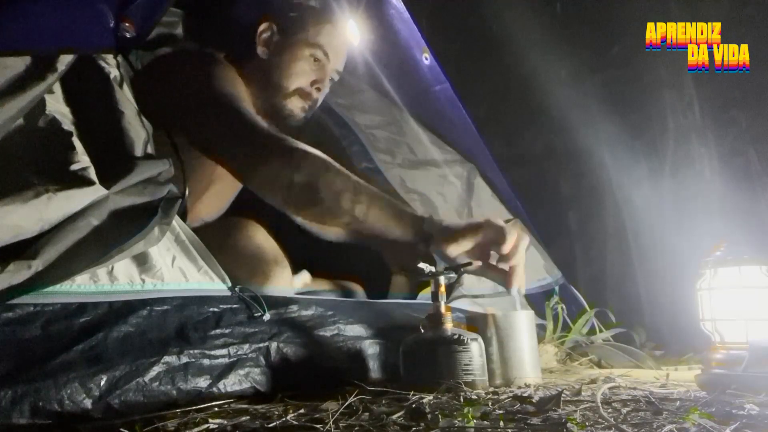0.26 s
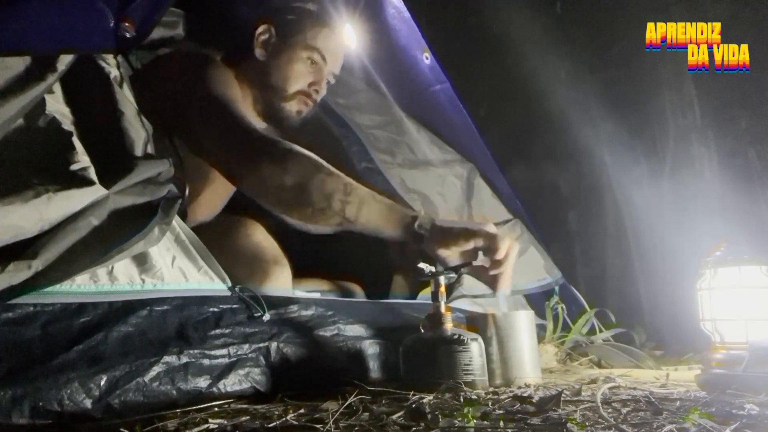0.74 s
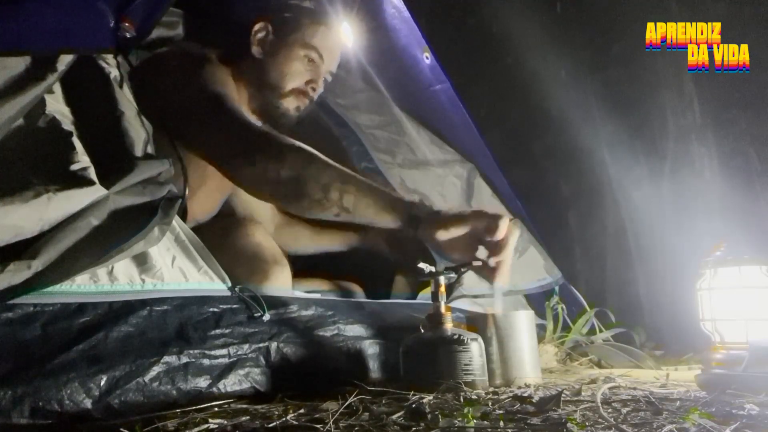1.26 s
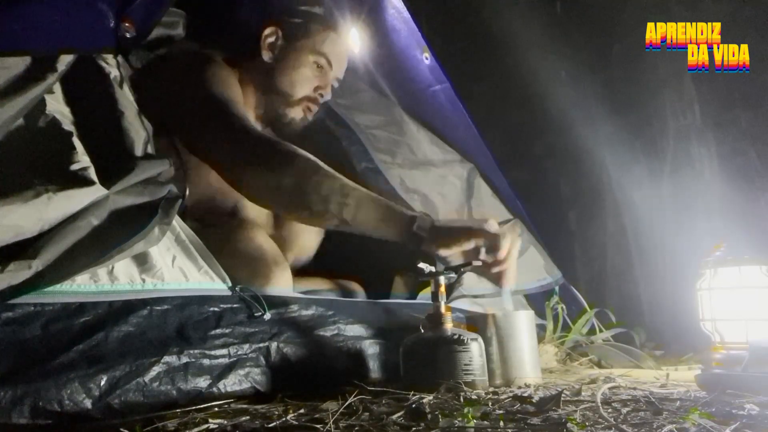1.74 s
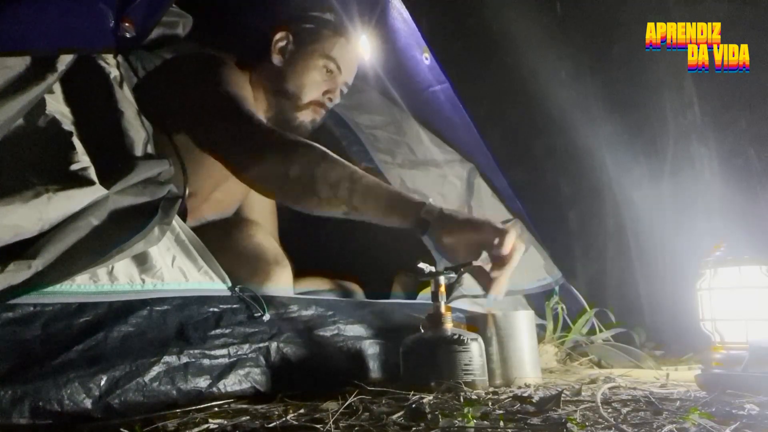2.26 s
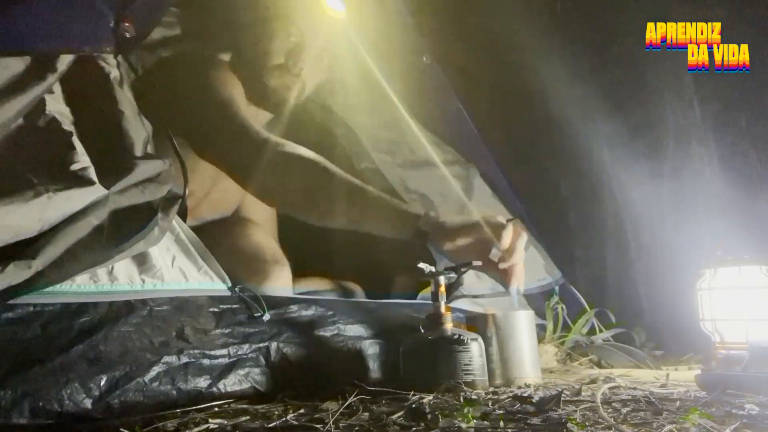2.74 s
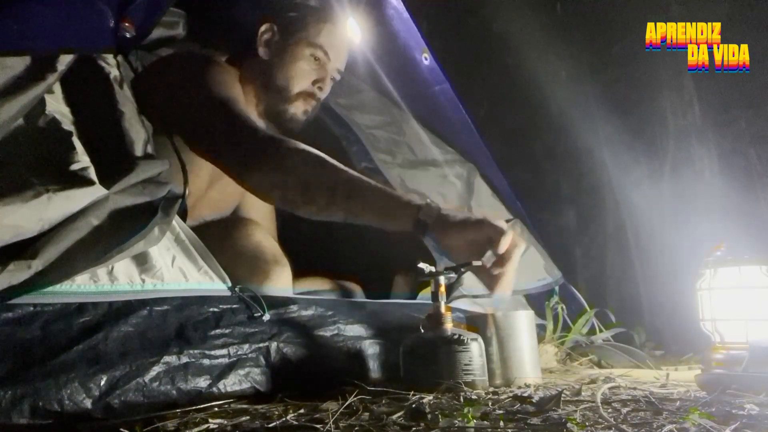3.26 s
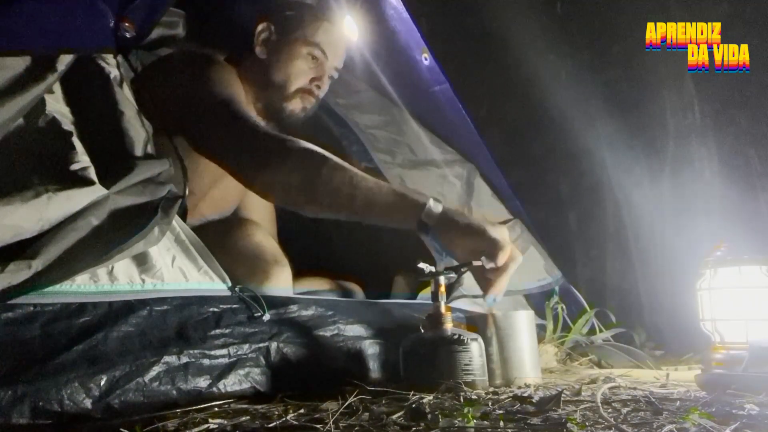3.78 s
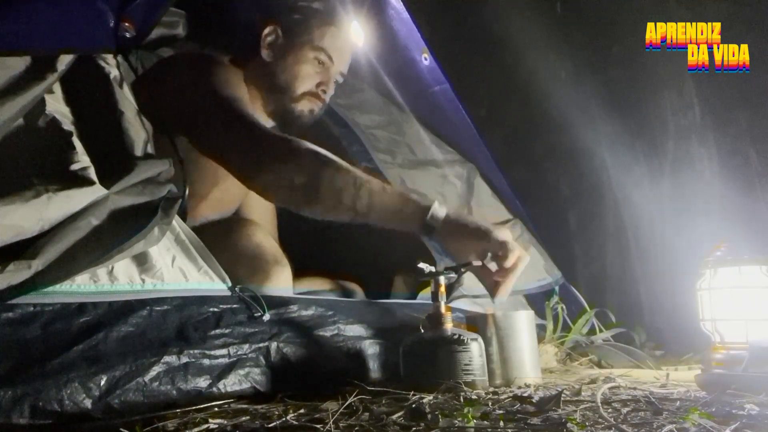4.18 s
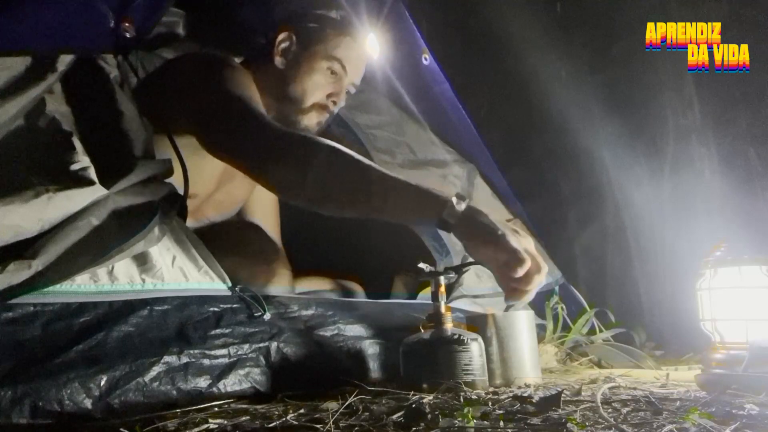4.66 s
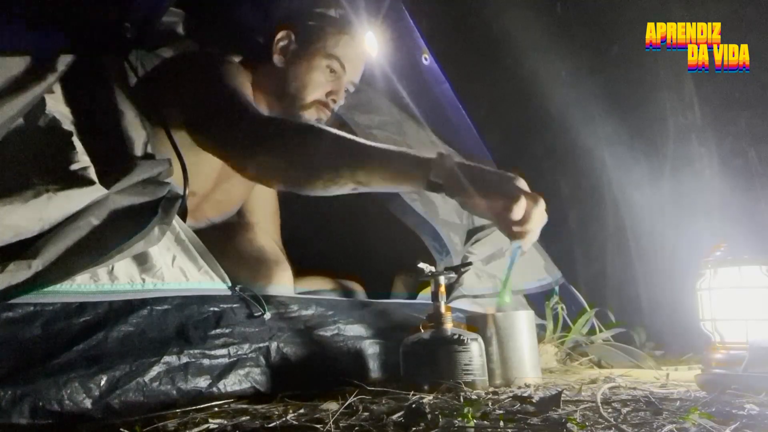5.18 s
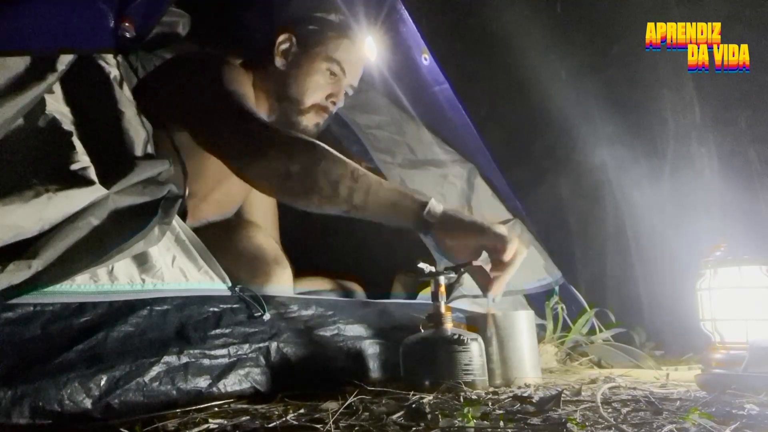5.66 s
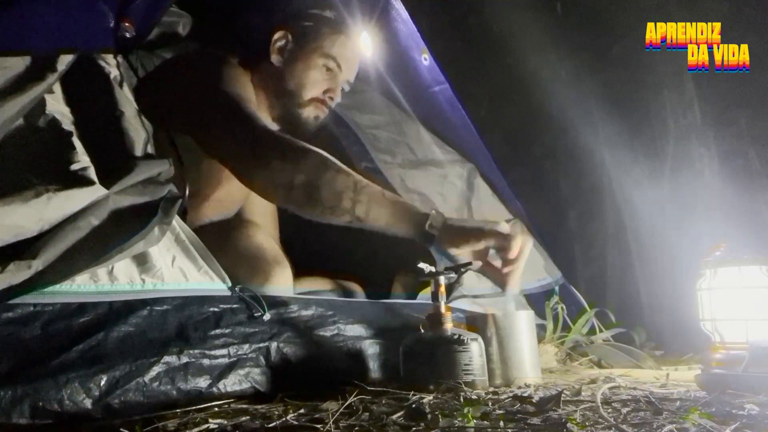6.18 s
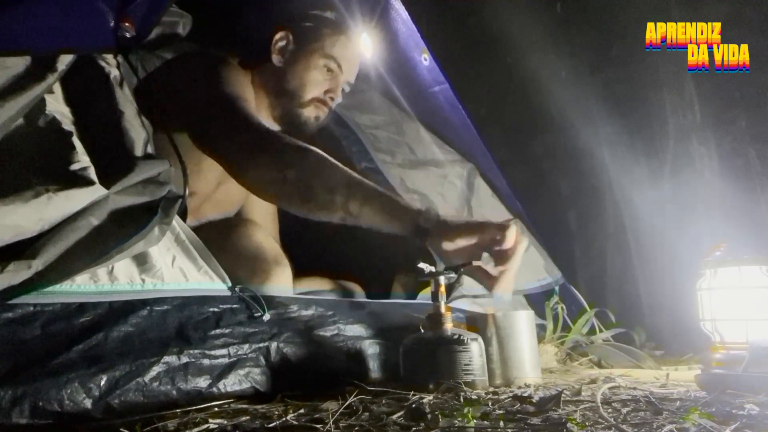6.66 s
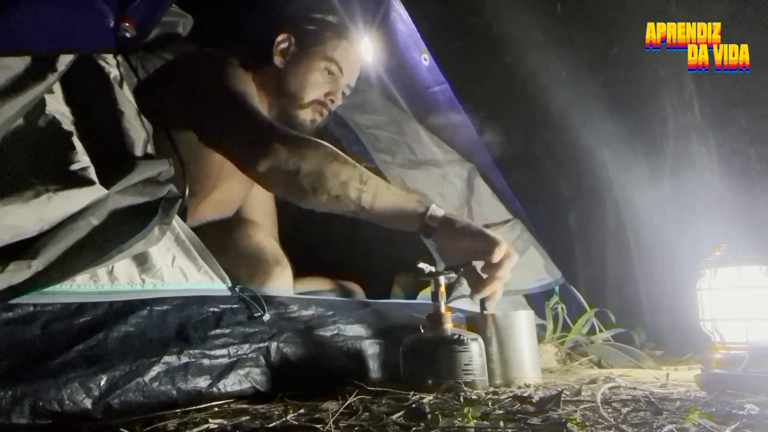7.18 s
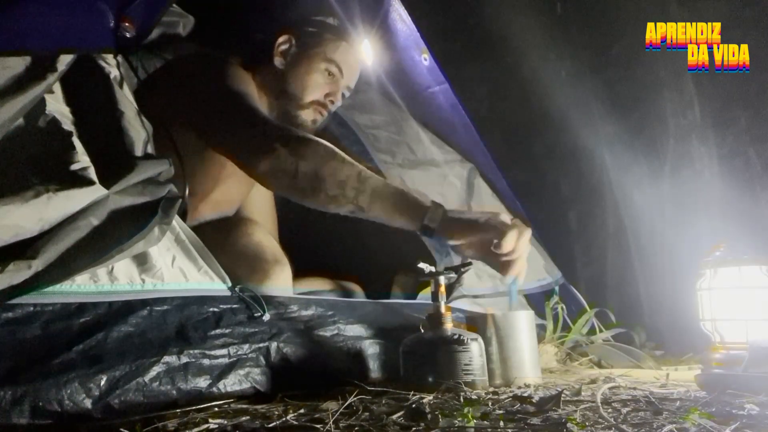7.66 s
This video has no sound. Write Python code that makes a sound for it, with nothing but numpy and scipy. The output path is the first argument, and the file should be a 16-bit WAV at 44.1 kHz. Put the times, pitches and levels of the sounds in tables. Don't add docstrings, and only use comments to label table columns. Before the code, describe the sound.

A low, soft gas flame roar close by, nylon rubbing and crinkling with small cup knocks, crickets trilling and a katydid rasping in the night.

```python
import sys
import numpy as np
from scipy import signal
from scipy.fft import rfft, irfft, next_fast_len
from scipy.io import wavfile
from scipy.ndimage import uniform_filter1d, map_coordinates

SR = 44100
rng = np.random.default_rng(int(sys.argv[2]) if len(sys.argv) > 2 else 0)


def waveform_to_disk(signal):
    frames = np.transpose(np.atleast_2d(signal))
    scaled = np.clip(frames, -1, 1) * 32767
    samples = np.round(scaled).astype(np.int16)
    wavfile.write(sys.argv[1], SR, samples)


def attenuation_scalar(level_db):
    decades = np.asarray(level_db, float) / 20
    return 10 ** decades


N = 349272

# (frequency [Hz], density [dB per Hz])
NIGHT_SPECTRUM = [(1200, -30), (2000, 0), (3080, 4.5), (3200, -4.5), (3900, -8.5), (4500, -8), (5800, 3),
                  (6800, -21), (7200, -24), (7700, -15), (9600, -17.5), (11000, -17.5), (15000, -22),
                  (16000, -32)]
# (pitch [Hz], spread [Hz], pulse rate [1/s], pulse [s], pitch fall [Hz], level [dB])
CHORUSES = [
    (2985, 40, 48, .017, 110, -60),
    (5483, 130, 55, .007, 220, -65.5),
    (6261, 125, 58, .0065, 220, -55.5),
]
# (multiple [1], level [dB])
LOW_CHORUS_OVERTONES = [(3, -17.5), (4, -26)]
# (time [s], length [s], level [dB])
PAIR_BOUTS = [(-.2, 0.32, -60), (.2, 1.2, -76), (1.052, .9, -67.5), (2.0, 1.3, -78), (2.95, 0.82, -69),
              (4.5, 1.05, -69.5), (6.35, 1.03, -68.5)]
# (time [s], rasp count [1])
RASP_COUNT = [(.118, 0), (2.158, 12), (3.545, 20), (4.081, 23), (4.899, 28), (7.955, 46)]
# (frequency [Hz], density [dB per Hz])
WING_SPECTRUM = [(6800, -45), (7300, -22), (7900, -8.5), (8300, -7.5), (8900, -9.5), (9400, -13)]
# (frequency [Hz], density [dB per Hz])
ROAR_SPECTRUM = [(12, -69), (20, -29), (37, -20), (56, -6.5), (81, -0.5), (112, -5), (245, -13), (450, -27),
                 (642, -27.5), (1210, -37), (2000, -46), (2700, -69), (2900, -57)]
# (frequency [Hz], width [Hz], level [dB])
CUP_FLUTTER = [(302, 182, -1.5)]
# (time [s], level [dB])
DRAUGHT_LEVEL = [(0, 6.5), (1, 7), (1.9, 7.5), (2.3, 8.5), (2.8, 2.5), (3.6, 1.5), (5.3, -0.5), (5.9, 7.5),
                 (7, 1), (7.92, 3)]
# (time [s], length [s], frequency [Hz], level [dB])
CUP_HUM = (2, .4, 343.5, -46)
# (frequency [Hz], density [dB per Hz])
THUD_SPECTRUM = [(150, 7), (300, 4), (900, 10), (1500, -2.5), (2500, -43), (4000, -60)]
# (frequency [Hz], density [dB per Hz])
SWISH_SPECTRUM = [(1000, 6), (2000, 8.5), (4200, 13), (7000, 7), (9000, -21), (12000, -28)]
# (frequency [Hz], density [dB per Hz])
CRINKLE_SPECTRUM = [(4000, -6), (7500, 3.5), (11000, -4.5), (14000, -6), (16000, -12)]
# (frequency [Hz], density [dB per Hz])
SPARKLE_SPECTRUM = [(10000, -26), (12500, -6), (13700, 5), (15500, -6)]
# (time [s], length [s], swish [dB], crinkle over swish [dB])
HAND_GRABS = [(0, 0.031, -62.5, -5), (0.07, 0.042, -62, -5.5), (0.134, 0.027, -56, -6.5),
              (0.146, 0.11, -64, -6), (.235, .025, -52, -7), (0.26, 0.085, -69.5, -12),
              (0.341, 0.021, -64, -12), (.38, .092, -69.5, -5), (0.555, 0.032, -56.5, -5.5),
              (.59, .055, -66, -4), (.69, .034, -72, -3), (0.736, .074, -66.5, -1), (0.784, 0.023, -59, -5),
              (0.813, 0.031, -61, -10), (0.854, 0.045, -56.5, -4), (.93, .13, -76, -8),
              (1.072, .041, -67, -4), (1.128, 0.031, -62.5, -2), (1.168, .061, -69, -1),
              (1.248, 0.05, -65, 0), (1.288, .025, -53, 2), (1.323, 0.033, -53, -4), (1.343, .036, -65, -4),
              (1.58, .12, -75, -5), (1.74, .07, -72, -7), (1.838, 0.065, -72, 0), (0, .55, -79, -5),
              (.45, .6, -78, -1), (1, .46, -77, -3)]
# (time [s], length [s], swish [dB])
ARM_STIRS = [(1.953, 0.032, -63), (1.993, 0.035, -71), (2.016, .047, -64.5), (2.193, 0.1, -69),
             (2.433, .11, -75), (2.592, 0.035, -63.5), (2.639, 0.065, -65), (2.877, .09, -67.5),
             (3.12, 0.09, -70.5), (3.21, 0.068, -70.5), (3.428, 0.19, -70), (3.738, 0.08, -70),
             (3.92, .2, -77), (4.263, 0.081, -73), (5.88, .39, -78.5)]
# (time [s], length [s], crinkle [dB])
FILM_FLEXES = [(1.97, .05, -73), (4.82, 0.16, -81), (5.1, .025, -73), (7.242, 0.091, -76),
               (7.468, .03, -71), (7.622, .018, -71), (7.658, 0.1, -83)]
# (time [s], crinkle peak [dB], swish over crinkle [dB])
FOLD_SNAPS = [(.2474, -55, 9), (.3421, -64, -8), (.3474, -66, 6), (.4234, -56, 0), (.519, -62, 3),
              (.6958, -59, -3), (.8634, -41, -7), (1.1313, -51, 5), (1.1875, -50, -4), (1.2521, -56, 1),
              (1.2974, -49, -6), (1.3259, -49, -3), (1.3364, -34.5, 5.5), (1.7534, -49, 4),
              (1.7574, -50, -8), (1.7908, -50, -11), (1.7964, -47, 1), (2.0024, -49, 6), (2.2744, -52, 17),
              (2.4917, -62, -2), (2.536, -45.5, 6), (2.594, -61, 8), (3.3373, -55, -3), (4.3026, -63, 5),
              (1.8462, -53, 11), (.1431, -64, 3)]
# (time [s], crinkle peak [dB], swish over crinkle [dB])
FILM_TICKS = [(.389, -62, -14), (2.494, -59, -6), (2.537, -55, -20), (3.1223, -62, -14), (4.2263, -58, -18),
              (5.1073, -52, -24), (5.1136, -45, -14), (5.3233, -58, -10), (6.0412, -62, -8),
              (7.2504, -58, -10), (7.2853, -58, -4), (7.3447, -50, -10), (7.478, -58, -24),
              (7.6301, -52, -8), (7.9154, -50, -12)]
# (time [s], peak [dB], ring
# [Hz], t60 [s], low thump [dB])
KNOCKS_AND_RINGS = [(.143, -43, 910, 0.017, -26), (0.2481, -20, 950, 0.014, -24), (.2482, -26, 490, 0.028, -50),
                    (0.866, -42, 1130, .03, -42), (.348, -27, 1100, 0.0065, -40), (0.573, -33, 1070, 0.022, -37),
                    (.793, -31.5, 706, 0.024, -26.5), (1.326, -23.5, 785, 0.02, -36),
                    (1.33, -28.5, 517, 0.031, -40), (1.337, -30.5, 1110, 0.017, -24),
                    (1.848, -32, 1280, 0.0079, -48), (1.8455, -44, 3280, 0.0069, -70),
                    (4.675, -45, 1650, 0.027, -70), (.125, -62, 4500, 0.046, -72), (.306, -48, 3590, .05, -72),
                    (1.082, -50, 4400, .05, -70), (1.092, -47, 4760, 0.038, -70)]

ROAR_DB, FLUTTER_DB, ROAR_FOLLOWS = -34.5, -45, 0.038
GRAB_THUD_DB, FIRM_DB, THUD_GROWS, CRISP_THINS = -54, -61, 1.28, .6
STIR_THUD_DB, STIR_CRINKLE_DB, STIR_START_S, DULLS_DB_PER_S = 7.5, -12.5, 2, -7
FILM_THUD_DB, FILM_SWISH_DB = 11.5, -19
SNAP_THUD_DB, SNAP_T60_S = 8, .003


def along(points, hz):
    f, db = np.transpose(points)
    return np.interp(np.log(hz + 1), np.log(f + 1), db, left=-120, right=-120)


def unit(x):
    return x / np.sqrt(np.mean(x ** 2) + 1e-20)


def curves(rows):
    s, *columns = np.transpose(rows)
    return [np.interp(np.arange(N) / SR, s, column) for column in columns]


def wobble(rate):
    coarse = np.arange(0, N + 16, 16)
    knots = rng.standard_normal(int(N * rate / SR) + 4)
    smooth = map_coordinates(knots, [coarse * rate / SR])
    return np.interp(np.arange(N), coarse, smooth)


def coloured(x, points):
    m = next_fast_len(N + 8192)
    gain = attenuation_scalar(along(points, np.fft.rfftfreq(m, 1 / SR)))
    return irfft(rfft(x, m) * unit(gain), m)[:N]


def night_hiss():
    return attenuation_scalar(-64.0 + 1.0 * wobble(14)) * coloured(rng.standard_normal(N), NIGHT_SPECTRUM)


def cricket(hz, rate, pulse_s, fall_hz, overtones=()):
    beat = np.cumsum(rate * (1 + .06 * wobble(9))) / SR + rng.random()
    stroke = beat.astype(int)
    progress = np.clip(beat % 1 / min(rate * pulse_s, 1), 0, 1)
    start_phase = 2 * np.pi * rng.random(N // 100)[stroke]
    phase = 2 * np.pi * np.cumsum(hz + fall_hz * (.5 - progress)) / SR + start_phase
    tone = np.sin(phase) + sum(attenuation_scalar(db) * np.sin(round(k) * phase) for k, db in overtones)
    size_db = 2.5 * rng.standard_normal(N // 100)[stroke] + 1.2 * wobble(5.5)
    return unit(np.sin(np.pi * progress) * attenuation_scalar(size_db) * tone)


def bouts(fade_s=.2):
    t = np.arange(N) / SR
    out = np.zeros(N)
    for s, length, db in PAIR_BOUTS:
        to_edge = np.minimum(t - s, s + length - t)
        out += attenuation_scalar(db) * np.clip(to_edge / fade_s + .5, 0, 1) ** 4.3
    return out


def crickets(count=5):
    pair = cricket(4870, 64, 0.0076, 330) + 0.7 * cricket(4720, 57, 0.0091, 330)
    out = bouts() * unit(pair)
    for row, (hz, spread_hz, rate, pulse_s, fall_hz, db) in enumerate(CHORUSES):
        overtones = LOW_CHORUS_OVERTONES if row == 0 else ()
        chorus = np.zeros(N)
        for place in np.linspace(-1, 1, count):
            pace = rate * (1 + .12 * rng.standard_normal())
            chorus += cricket(hz + spread_hz * place, pace, pulse_s, fall_hz, overtones)
        out += attenuation_scalar(db) * unit(chorus)
    return out


def grass(x):
    tails = rng.standard_normal((2, SR // 8)) * attenuation_scalar(-60 * np.arange(SR // 8) / SR / 0.28)
    tails = tails / np.linalg.norm(tails[0])
    sway = 3.05 * wobble(6)
    paths = signal.fftconvolve(x[None], tails, axes=1)[:, :N]
    return 0.65 * x + 0.55 * (np.cos(sway) * paths[0] + np.sin(sway) * paths[1])


def katydid():
    cycle = curves(RASP_COUNT)[0]
    swell = np.clip(0.59 + 0.53 * np.cos(2 * np.pi * cycle), 0, 1) ** 1.4
    teeth = rng.standard_normal(N) * attenuation_scalar(1.2 * wobble(300))
    return attenuation_scalar(-72) * swell * unit(coloured(teeth, WING_SPECTRUM))


def cup_hum():
    s, length, hz, db = CUP_HUM
    progress = np.clip((np.arange(N) / SR - s) / length, 0, 1)
    swell = np.sin(np.pi * progress).clip(0) ** 0.6
    tone = np.sin(2 * np.pi * np.cumsum(hz * (1 + .015 * wobble(12))) / SR)
    return attenuation_scalar(db + 4 + 1.5 * wobble(15)) * swell * tone


def knocks():
    out, t = np.zeros(N + SR), np.arange(SR // 10) / SR
    thump = attenuation_scalar(-60 * t / 0.047) * np.sin(2 * np.pi * 250 * t)
    for s, db, hz, t60, thump_db in KNOCKS_AND_RINGS:
        ring = np.sin(2 * np.pi * hz * t) + 0.12 * np.sin(2 * np.pi * 1.47 * hz * t)
        ring *= attenuation_scalar(db - 60 * t / t60) * (1 - np.exp(-t / .00025))
        crack = attenuation_scalar(db - 26 - 60 * t / .006) * rng.standard_normal(len(t))
        out[int(s * SR):][:len(t)] += ring + crack + attenuation_scalar(thump_db) * thump
    return out[:N]


def strokes():
    out = []
    for s, length, db, bright_db in HAND_GRABS:
        thud_db = GRAB_THUD_DB + THUD_GROWS * (db - FIRM_DB) - CRISP_THINS * bright_db
        out.append((s, length, thud_db, db, db + bright_db))
    for s, length, db in ARM_STIRS:
        crinkle_db = db + STIR_CRINKLE_DB + DULLS_DB_PER_S * (s - STIR_START_S)
        out.append((s, length, db + STIR_THUD_DB, db, crinkle_db))
    for s, length, db in FILM_FLEXES:
        out.append((s, length, db + FILM_THUD_DB, db + FILM_SWISH_DB, db))
    return out


def contact_levels(thud_db, swish_db, crinkle_db):
    sparkle_db = crinkle_db - 10 + 0.51 * np.clip(crinkle_db - swish_db, -25, 24)
    return thud_db, swish_db, crinkle_db, sparkle_db


def nylon():
    out = np.zeros(N)
    catch = wobble(600)
    snap = attenuation_scalar(-60 * np.arange(400) / SR / SNAP_T60_S)
    stroke_trim_db, snap_trim_db = (1.5, 5.5, 2.5, -6.0), (-2.5, 1.0, -3.0, 2.0)
    for k, colour in enumerate((THUD_SPECTRUM, SWISH_SPECTRUM, CRINKLE_SPECTRUM, SPARKLE_SPECTRUM)):
        power = np.zeros(N + 400)
        for s, length, *db in strokes():
            u = np.linspace(0, 1, int(1.28 * length * SR))
            stroke = unit(np.sin(np.pi * u ** 0.87).clip(0) ** 1.1)
            level_db = contact_levels(*db)[k] + stroke_trim_db[k]
            start = max(int((s - .15 * length) * SR), 0)
            power[start:][:len(u)] += (attenuation_scalar(level_db) * stroke) ** 2
        power[:N] *= unit(attenuation_scalar(1.2 * catch.clip(0) ** 2 + 1.76 * wobble(200))) ** 2
        for s, db, over_db in FOLD_SNAPS + FILM_TICKS:
            swish_db = db + over_db
            level_db = contact_levels(swish_db + SNAP_THUD_DB, swish_db, db)[k] + snap_trim_db[k]
            power[int(s * SR):][:400] += (attenuation_scalar(level_db) * snap) ** 2
        out += coloured(np.sqrt(power[:N]) * rng.standard_normal(N), colour)
    return out


def folds(x, depth_db=2.8):
    z = signal.stft(x, nperseg=256)[2]
    field = uniform_filter1d(rng.standard_normal(z.shape), size=4, axis=0)
    field = uniform_filter1d(field, size=5, axis=1)
    return signal.istft(z * unit(attenuation_scalar(depth_db * unit(field))), nperseg=256)[1][:N]


def tent(x):
    tail = rng.standard_normal(SR // 8) * attenuation_scalar(-60 * np.arange(SR // 8) / SR / 0.07)
    tail = signal.lfilter(*signal.butter(1, 7000, fs=SR), tail / np.linalg.norm(tail))
    return x + attenuation_scalar(-9.5) * signal.fftconvolve(x, tail)[:N]


def flame():
    draught_db, = curves(DRAUGHT_LEVEL)
    roar = coloured(rng.standard_normal(N) * attenuation_scalar(0.28 * wobble(14)), ROAR_SPECTRUM)
    roar_db = ROAR_DB + ROAR_FOLLOWS * draught_db + .5 * wobble(1.42) + 1.02
    hz, width_hz, db = CUP_FLUTTER[0]
    b, a = signal.butter(2, [hz - width_hz / 2, hz + width_hz / 2], "band", fs=SR)
    flutter = unit(signal.lfilter(b, a, rng.standard_normal(N)))
    flutter_db = FLUTTER_DB + draught_db + 1.64 * wobble(4) + db - 5.0
    return attenuation_scalar(roar_db) * unit(roar) + attenuation_scalar(flutter_db) * flutter


def scene():
    far = night_hiss() + grass(crickets()) + katydid()
    near = cup_hum() + tent(folds(nylon()) + knocks()) + flame()
    return (far + near)[None]


def masked_gap(x):
    m = next_fast_len(N)
    hz, spectrum = np.fft.rfftfreq(m, 1 / SR), rfft(x, m)
    for low_hz, high_hz in ((6850, 7150), (7150, 7500)):
        band = irfft(spectrum * ((hz > low_hz) & (hz <= high_hz)), m)[..., :N]
        power = uniform_filter1d(band ** 2, size=1536)
        weak = 1. * (power < np.quantile(power, .28))
        x = x - band * uniform_filter1d(weak, size=512)
    return x


def low_pass(x):
    return signal.sosfilt(signal.butter(12, 15710, fs=SR, output="sos"), x)


def record(dry):
    mix = masked_gap(dry)
    return low_pass(mix)


dry = scene()
out = record(dry)
waveform_to_disk(out)
```